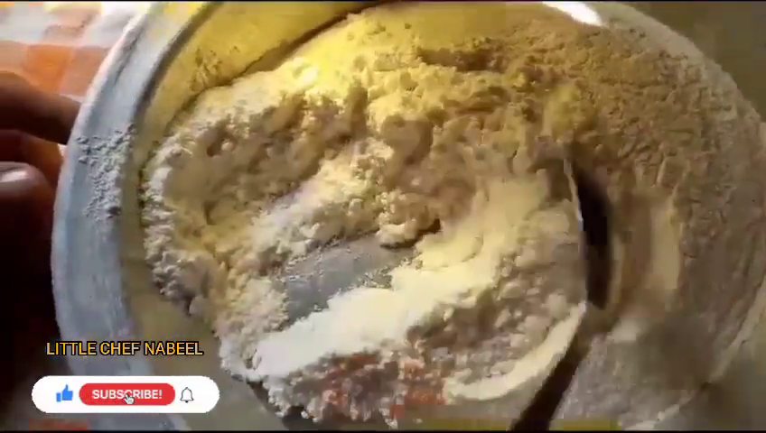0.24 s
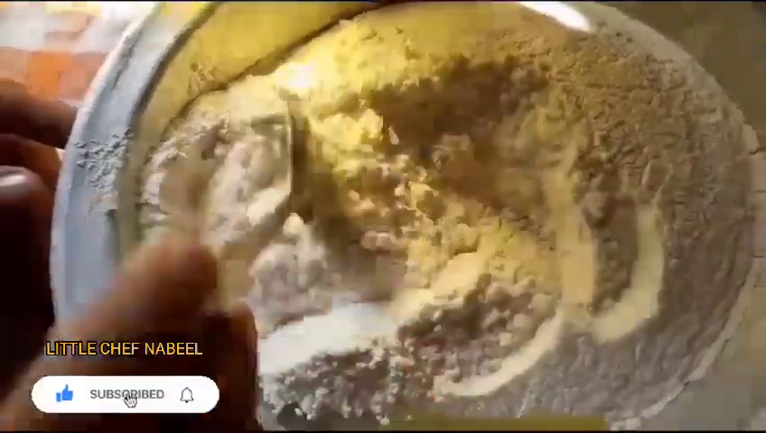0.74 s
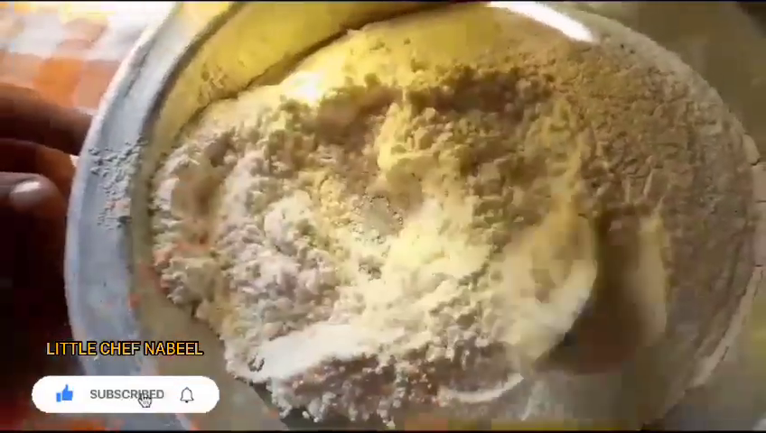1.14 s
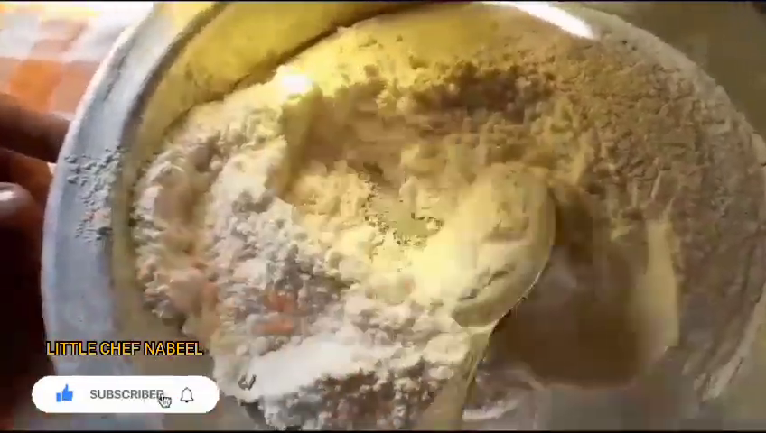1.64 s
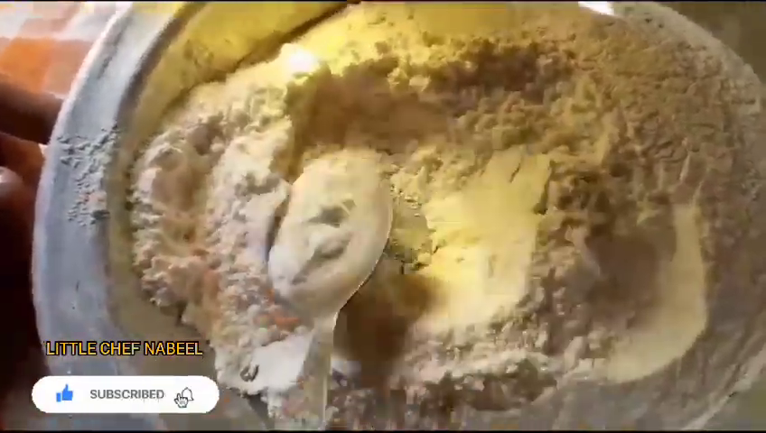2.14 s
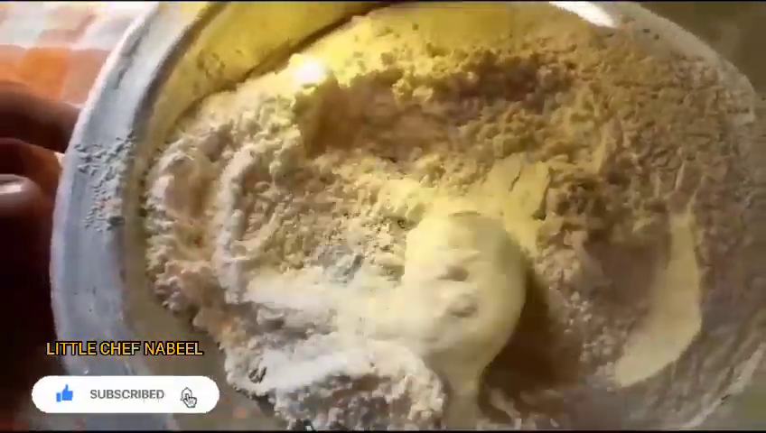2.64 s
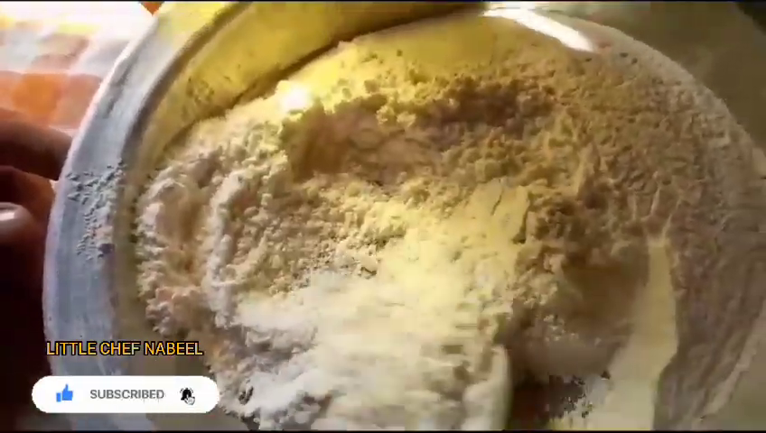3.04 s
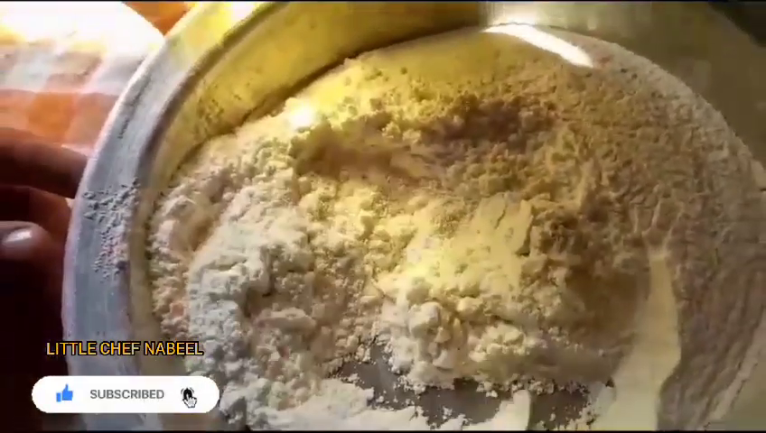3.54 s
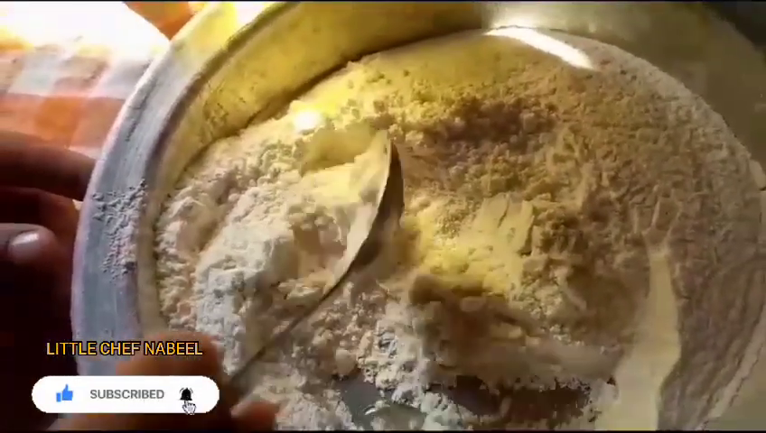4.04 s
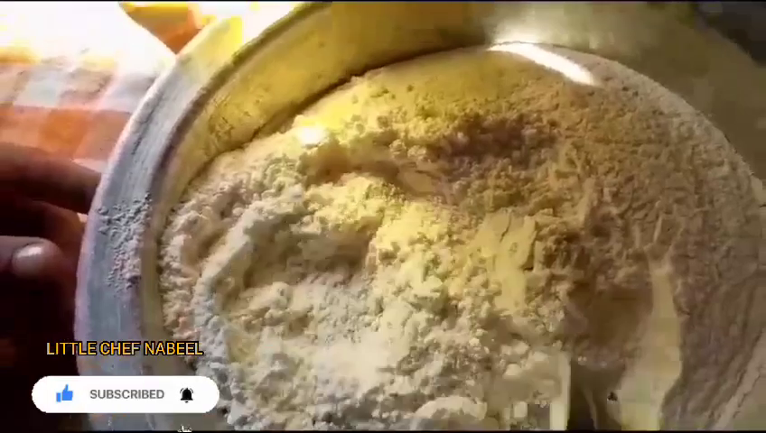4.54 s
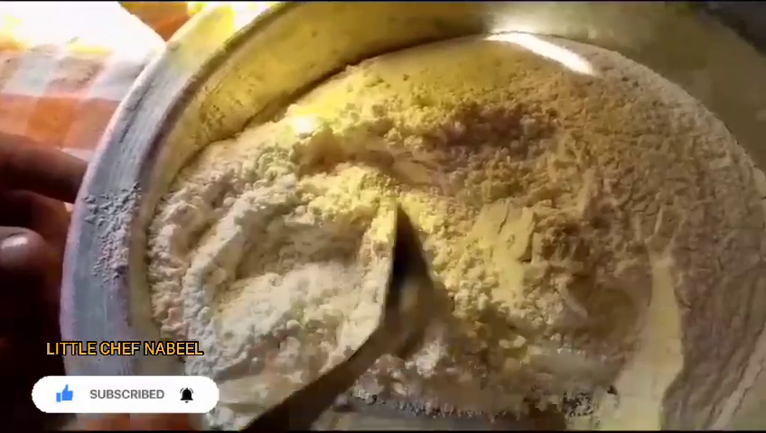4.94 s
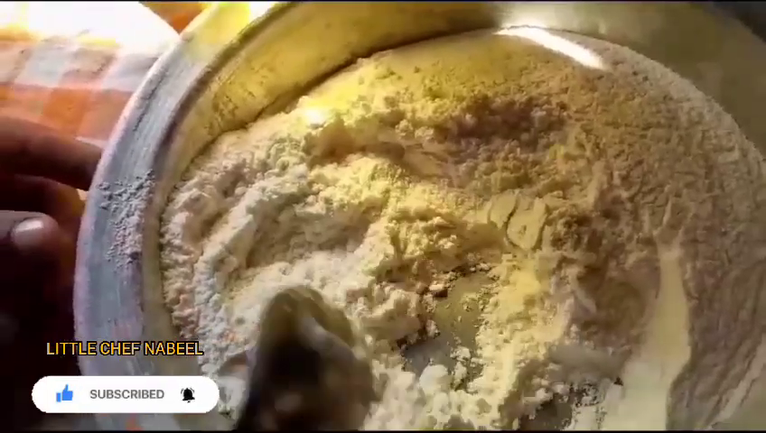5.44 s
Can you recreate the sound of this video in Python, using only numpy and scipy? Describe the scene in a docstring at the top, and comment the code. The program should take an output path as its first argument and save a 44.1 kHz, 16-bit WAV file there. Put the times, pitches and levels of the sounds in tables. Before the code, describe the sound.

Soft flour rustling and light spoon scrapes grow into louder knocks and gritty scraping on a metal bowl, above a low hum.

```python
"""A steel spoon in a steel bowl of flour, close to a handheld two-port microphone in a small kitchen.
A low hum wavers over faint hiss throughout. First the edge scrapes and knocks softly; from 1.3 s light
strokes stir the flour and a faint tone sounds far off. From 2.9 s the edge lands with dull knocks and
judders over the metal in grainy slips, hitting hardest at 3.5 and 4.6 s. A higher far tone blips twice
just before the second of these blows. After 5.3 s the flour settles under one last light scrape."""
import sys
import numpy as np
from scipy import signal
from scipy.io import wavfile
from scipy.ndimage import uniform_filter1d

SR = 44100
rng = np.random.default_rng(int(sys.argv[2]) if len(sys.argv) > 2 else 0)


def wrap_up_sound(samples):
    """Save the sound to the file named by the first command line argument, as 16-bit audio."""
    columns = np.atleast_2d(samples).T
    # keep every value between -1 and 1, then stretch to whole-number steps
    tamed = np.clip(columns, -1, 1)
    steps = np.round(tamed * 32767).astype(np.int16)
    wavfile.write(sys.argv[1], SR, steps)


N = 251370

# Broad hump of noise in the kitchen's hum: freq_hz, density_db
HUM_SPECTRUM = [(12, -88), (20, -44), (32, -41.5), (53, -22.5), (86, -12.5), (134, 2), (168, -7),
                (229, -20), (338, -24), (398, -34.5), (512, -29.5), (577, -40.5), (700, -44.5),
                (910, -99.5), (1540, -120)]
# Swell and fade of the whole hum: time_s, level_db
HUM_LEVEL = [(0.0, -49), (0.38, -56), (0.44, -44.5), (0.65, -52), (1.03, -50.5), (1.11, -61), (1.17, -51),
             (1.57, -60), (1.6, -53), (1.94, -48.5), (2.6, -52), (3.78, -43.5), (4.09, -46), (4.14, -43),
             (5.64, -44.5), (5.7, -55)]
# Low tones in the hum: pitch_hz, drift_share, then level_db (re the hum) at each of DRONE_TIMES
DRONES = [(102.9, .07, -5, -4.5, -7, -9, -7.5, -8.5), (128.75, .04, -8.5, -13, -9.5, -7.5, -3.5, -0.5),
          (153.8, .04, -27, -19, -5.5, -8, -4, -17)]
# Moments at which the drone levels are set: time_s
DRONE_TIMES = (0, 1.5, 1.75, 3.0, 4.3, 5.7)
# Faint background hiss: freq_hz, density_db
HISS_SPECTRUM = [(290, -35), (500, -15.5), (600, -7.5), (1150, -10.5), (1900, -15), (2800, -16),
                 (7300, -26), (9000, -24), (10000, -19), (14200, -16.5), (14900, -25.5), (15700, -26)]
# How alike the background noise is at the two ports: freq_hz, correlation
PORT_LIKENESS = [(30, .5), (70, .975), (150, .96), (300, .7), (700, .4), (3000, .2), (15000, .1)]
# The edge dragged over steel, one curve a scrape: time_s, pressure_db, brightness_db, bottom_hz
SCRAPES = [
    [(0.0, -49.5, -11, 684), (0.034, -63.5, -7.5, 883), (0.12, -82.5, -6, 835)],
    [(0.402, -67.5, 7, 1180), (0.43, -58.5, 2, 1240), (0.476, -52, -2, 1250), (0.5, -66.5, -3, 1220)],
    [(0.765, -62, 1, 761), (0.783, -63.5, -2, 810), (0.831, -46, -2.5, 756), (0.855, -65.5, -3, 820),
     (0.92, -85, 4, 806)],
    [(1.155, -54, -15.5, 836), (1.171, -60, 7, 1216), (1.193, -46.5, 4, 1270), (1.249, -73.5, -3.5, 1270),
     (1.29, -85, 7, 979)],
    [(2.92, -75, 2, 597), (2.99, -39, -10.5, 540), (3.042, -37, -12.5, 1290), (3.086, -35.5, -10, 1310),
     (3.132, -34.5, -11.5, 787), (3.182, -34.5, -3, 890), (3.205, -57, -6, 850)],
    [(3.515, -35.5, -28.5, 788), (3.54, -44, -33.5, 860), (3.585, -54.5, -3.5, 825),
     (3.601, -44, -11.5, 810), (3.68, -57.5, -1, 1140)],
    [(3.67, -53.5, -12, 925), (3.75, -33.5, -13.5, 740), (3.802, -43.5, -10, 750), (3.842, -32, -10, 746),
     (3.854, -40, 6.5, 858), (3.898, -36.5, -14, 880), (3.935, -57, -3, 910), (3.97, -81, -3, 910)],
    [(4.586, -34.5, -34, 900), (4.622, -47, -18.5, 847), (4.655, -52, -10, 814)],
    [(4.645, -50, -12, 1090), (4.699, -37.5, -5, 1326), (4.75, -37, -12.5, 1235), (4.789, -37, -4, 1188),
     (4.82, -61.5, -4.5, 1170)],
    [(5.17, -62.5, -8.5, 910), (5.224, -34.5, -7, 853), (5.254, -28.5, -12.5, 818),
     (5.31, -37.5, -3.5, 854), (5.345, -54.5, -1.5, 878)],
    [(5.66, -68.5, 6, 1134), (5.7, -50.5, -2, 1065)],
]
# Where each scrape rubs: wall_db (re pressure), wall_hz, bare_steel_db (how freely the modes ring)
SCRAPE_SPOTS = [(3.5, 2700, -13), (-4.5, 2730, -2.5), (-6.5, 3750, -3.5), (-4.5, 4000, -7), (3, 3400, -3.5),
                (-1.5, 3500, 0.5), (2.5, 4500, 1), (-3, 2200, -2.5), (1.5, 4500, -1), (-7, 3510, 0.5),
                (-6.5, 2800, -1)]
# Modes of the bowl, before the flour's added damping: pitch_hz, width_hz, level_db
BOWL_MODES = [(883, 300, 6.5), (1498, 77, 1.5), (2424, 22, -29), (3174, 840, -5.5), (3996, 160, -11.5),
              (4430, 180, -10.5), (5296, 300, -7), (5830, 43, -7.5), (6440, 180, -19), (6770, 330, -12),
              (7330, 36, -5), (7584, 78, 0), (8338, 260, -12.5), (8600, 44, -18), (9100, 41, -25),
              (9750, 26, -29.5), (10100, 62, -27.5), (13700, 270, -18), (13550, 530, -24),
              (14100, 51, -30.5)]
# Dull sound of contact between the modes: freq_hz, level_db
CONTACT_SPECTRUM = [(240, -30), (400, -19.5), (615, 0.5), (822, 1.5), (1130, 1.5), (2330, -7),
                    (2720, -13.5), (3270, -25), (4800, -20), (6930, -27), (7720, -15.5), (15600, -27)]
# The spoon meets or catches on the bowl:
# start_s, level_db, thump_db, brightness_db (both re level), bottom_hz, wall_hz
KNOCKS = [(0.403, -55, 18, -7, 1570, 2760), (0.758, -45, 8, -6, 530, 3030),
          (0.804, -40, -26.5, -26, 850, 3580), (1.149, -34.5, 1.5, -12, 550, 2960),
          (1.179, -34, -2, -19.5, 1500, 4520), (1.568, -49.5, -20, -23, 1600, 2860),
          (2.921, -60, 1, -8.5, 450, 3010), (2.963, -26, -27.5, -16, 518, 2800),
          (2.987, -29.5, -21.5, -20, 540, 3530), (3.029, -24.5, -24.5, -20, 1387, 4050),
          (3.065, -23, -30, -8.5, 793, 3200), (3.089, -28.5, -33, 8.5, 1444, 3600),
          (3.103, -22.5, -30.5, -3.5, 1670, 3530), (3.161, -29, -35.5, 9.5, 775, 3380),
          (3.167, -22.5, -31.5, -15, 680, 3380), (3.179, -21.5, -39.5, -2, 963, 3380),
          (3.5043, -12, -10.5, -20.5, 652, 3200), (3.603, -23.5, -25, -16, 705, 3930),
          (3.63, -29.5, -26.5, -18.5, 1510, 3750), (3.721, -29, -25, -21.5, 1443, 3330),
          (3.746, -22, -29.5, -14, 760, 3900), (3.837, -20.5, -41, -20, 840, 3600),
          (3.855, -33.5, -27.5, 18.5, 1160, 3510), (3.902, -28, -36, -9, 950, 3720),
          (4.575, -10, -6.5, -16, 650, 3230), (4.662, -31.5, -22, -16, 1380, 3280),
          (4.787, -21, -29.5, -1.5, 1749, 4040), (4.8, -31, -35, 0.5, 1258, 2860),
          (5.221, -34.5, -22, -19, 860, 3570), (5.273, -22, -29.5, -20, 729, 3310),
          (5.312, -25.5, -35.5, -19.5, 770, 3000)]
# Flour pushed aside or settling: loudest_s, rustle_db, crumbs_db, crumbs_hz, rise_s, fall_s
STIRS = [(0.504, -71.5, -68.5, 2220, 0.00965, 0.12), (0.659, -92, -77.5, 2430, 0.33, 0.39),
         (.905, -77, -73.5, 2000, 0.0105, 0.07), (1.285, -79, -78, 2500, 0.0087, .1),
         (1.563, -63, -73.5, 1600, 0.084, 0.084), (1.904, -66.5, -74, 1440, .065, .09),
         (2.308, -62.5, -77.5, 2100, 0.0878, 0.06), (2.441, -85, -86, 1200, 0.22, .1),
         (2.63, -62, -76, 1100, .085, 0.06), (3.209, -63, -74, 3200, 0.0114, .1),
         (3.33, -82.5, -80, 2200, 0.16, 0.293), (3.959, -71.5, -68.5, 3213, .01, 0.18),
         (4.25, -74.5, -73.5, 2605, 0.33, 0.17), (4.336, -65, -79.5, 2491, 0.1105, 0.13),
         (4.83, -68, -69.5, 2780, 0.011, 0.1), (4.93, -78, -73.5, 2650, 0.218, 0.6),
         (5.345, -69, -63, 2286, .01, 0.219), (5.439, -82, -76, 2300, .15, 0.218),
         (5.534, -67.5, -61, 2217, .008, 0.18)]
# Rustle of fine flour: freq_hz, density_db
RUSTLE_SPECTRUM = [(2350, -37), (4000, -18.5), (4430, -14.5), (5410, -7.5), (6130, -5), (7620, -6),
                   (9040, -5.5), (10000, -4), (12100, -6.5), (13900, -4), (15600, -19)]
# Tumbling crumbs: freq_hz, density_db
CRUMB_SPECTRUM = [(710, -21.5), (1200, -10.5), (1820, 0.5), (1970, -7), (2260, -1), (3140, 2.5), (3840, -8),
                  (5000, -2.5), (6500, -43), (11000, -120)]
# Faint far tones: start_s, pitch_hz, level_db, fade_s (to 20 dB down)
FAR_TONES = [(1.43, 831, -66, .14), (4.335, 1306, -78.5, .04), (4.43, 1306, -80, .035)]
# Reverberation of the kitchen: freq_hz, t60_s
KITCHEN_DECAY = [(300, 0.38), (1000, .24), (3000, 0.32), (7000, 0.087), (14000, 0.21)]
# Colour of the right port re the left: freq_hz, gain_db
RIGHT_COLOUR = [(100, -20.5), (400, -3), (1500, -2.5), (2500, -1), (3800, -4.5), (5000, -6), (6500, -19),
                (7600, -32.5), (8800, -21), (10400, -1), (12000, -12), (14300, -17.5), (15200, -47.5)]
# Lag of the right port behind the left: freq_hz, lag_rad
RIGHT_LAG = [(0, 0), (500, .6), (1100, 1.5), (2300, 1.1), (3300, 5.5), (4500, 8.5), (16000, 37)]
# Wavering of that lag as the spoon moves: freq_hz, waver_rad
RIGHT_WAVER = [(200, .35), (700, .3), (1500, .55), (4000, .95), (9000, 1.7), (15000, 2.1)]

HUMP_DB, HISS_DB = -2.5, -79.5  # the hump is re the level of the hum
DRONE_WAVER_DB, DRONE_PACE = 2.5, 4.16
WALL_DRIFT_SHARE, WALL_SLOPE = 0.057, 0.66  # slopes: dB for each dB of a scrape's brightness
RASP_DB, RASP_SLOPE = 2, 0.26
KNOCK_DECAY_S, KNOCK_FIZZ_DB, CUSHION_HZ, THUMP_HZ = 0.0026, -8, 1500, 261
STIR_SWELL_DB, TONE_RISE_S = 23, 0.035
LOW_SPLIT_HZ, HIGH_SPLIT_HZ, BAND_LIMIT_HZ = 2600, 6500, 15790


def amp(db):
    """Decibels to gain."""
    return 10 ** (np.asarray(db) / 20)


def unit_rms(x):
    """Scales to rms 1."""
    return x / np.sqrt(np.mean(x ** 2) + 1e-20)


def at_freq(table, hz):
    """Reads a table on a log-frequency axis."""
    freq_hz, value = np.transpose(table)
    return np.interp(np.log(hz + 1), np.log(freq_hz + 1), value)


def add(mix, start_s, sound):
    """Mixes a sound in at start_s."""
    part = mix[round(start_s * SR):][:len(sound)]
    part += sound[:len(part)]


def wander(count, pace):
    """Slow random drift of rms 1; a higher pace turns sooner."""
    steps = rng.standard_normal(int(count / SR * 40) + 3)
    steps = signal.lfilter([1], [1, -np.exp(-pace / 10)], steps)
    return unit_rms(np.interp(np.arange(count) / SR * 40, np.arange(len(steps)), steps - steps.mean()))


def patches(noise, bins, frames):
    """Smooths a frequency-by-time grid of noise into patches of rms 1."""
    return unit_rms(uniform_filter1d(uniform_filter1d(noise, bins, axis=0), frames, axis=1))


def impulse(spectrum):
    """Minimum-phase response with the given spectrum."""
    hz = abs(np.fft.fftfreq(4096, 1 / SR))
    log_gain = np.log(amp(np.maximum(at_freq(spectrum, hz), -100)))
    return np.fft.ifft(np.exp(np.conj(signal.hilbert(log_gain)))).real[:2048]


def resonate(x, hz, *widths_hz):
    """A resonance that can move in pitch, applied once for each width."""
    turn = np.exp(2j * np.pi * np.cumsum(hz * np.ones(len(x))) / SR)
    for width_hz in widths_hz:
        pole = np.exp(-np.pi * width_hz / SR)
        x = 2 * (turn * signal.lfilter([1 - pole], [1, -pole], x / turn)).real
    return x


def band(x, kind, hz, order=4):
    """Low-pass or high-pass filter."""
    return signal.sosfilt(signal.butter(order, hz, kind, fs=SR, output="sos"), x)


def split(x):
    """Low, middle and high part of a sound."""
    upper = band(x, "high", LOW_SPLIT_HZ)
    mid, high = band(upper, "low", HIGH_SPLIT_HZ), band(upper, "high", HIGH_SPLIT_HZ)
    return band(x, "low", LOW_SPLIT_HZ), mid, high


def room_noise(spectrum, patchy_db, size):
    """Background noise with drifting patches, partly alike at the two ports."""
    frames, hz = 4 * N // size + 5, np.fft.rfftfreq(size, 1 / SR)
    left_re, left_im, apart_re, apart_im, unevenness = rng.standard_normal((frames, len(hz), 5)).T
    likeness = at_freq(PORT_LIKENESS, hz)[:, None]
    left = left_re + 1j * left_im
    right = likeness * left + np.sqrt(1 - likeness ** 2) * (apart_re + 1j * apart_im)
    gain = amp(at_freq(spectrum, hz)[:, None] + patchy_db * patches(unevenness, bins=10, frames=6))
    noise = signal.istft(gain * np.array([left, right]), nperseg=size, noverlap=3 * size // 4)[1]
    return unit_rms(noise[:, :N])


def drone(pitch_hz, drift_share, *levels_db):
    """Noise through a narrow, drifting resonance: a fuzzy low tone that comes and goes."""
    hz = pitch_hz * (1 + drift_share * wander(N, DRONE_PACE))
    waver = unit_rms(amp(DRONE_WAVER_DB * wander(N, DRONE_PACE)))
    level_db = np.interp(np.arange(N) / SR, DRONE_TIMES, levels_db)
    return amp(level_db) * waver * unit_rms(resonate(rng.standard_normal(N), hz, 5, 3.4))


def hum():
    """The kitchen's hum: a hump of low noise with drones on top, all swelling and fading together."""
    hump = amp(HUMP_DB) * room_noise(HUM_SPECTRUM, patchy_db=2.5, size=4096)
    level_db = np.interp(np.arange(N) / SR, *np.transpose(HUM_LEVEL))
    return amp(level_db) * (hump + sum(drone(*row) for row in DRONES))


def hiss():
    """Faint, steady broadband noise behind everything."""
    return amp(HISS_DB) * room_noise(HISS_SPECTRUM, patchy_db=0.1, size=1024)


def grit(count, per_s, spread_db, smooth):
    """Grains: random clicks of uneven size over a share of smooth noise."""
    chance, size, noise = rng.random(count), rng.exponential(1, count), rng.standard_normal(count)
    clicks = np.sign(noise) * amp(spread_db * np.minimum(size, 4)) * (chance < per_s / SR)
    return unit_rms(clicks) + smooth * noise


def bowl_ring(touch_db, bare_steel_db):
    """The bowl after one click: modes, weighted by where it is touched, over the dull contact sound."""
    t = np.arange(2048) / SR
    modes = sum(amp(db + weight_db) * width * np.exp(-np.pi * width * t) * np.sin(2 * np.pi * hz * t)
                for (hz, width, db), weight_db in zip(BOWL_MODES, touch_db))
    flour_damping = np.exp(-t / 0.0035)
    contact = unit_rms(impulse(CONTACT_SPECTRUM))
    return amp(bare_steel_db) * unit_rms(flour_damping * modes) + 1.28 * contact


def scrape(curve, wall_db, wall_hz, ring):
    """The edge sticks and slips: bursts of grit shake the bowl; bottom and wall shift in pitch."""
    times_s, *columns = np.transpose(curve)
    t = np.arange(times_s[0], times_s[-1], 1 / SR)
    pressure_db, brightness_db, bottom_hz = (np.interp(t, times_s, column) for column in columns)
    count = len(t)
    drifting_hz = wall_hz * (1 + WALL_DRIFT_SHARE * wander(count, pace=8.9))
    slips = abs(grit(count, per_s=140, spread_db=1, smooth=0))
    judder = unit_rms(signal.lfilter([1], [1, -np.exp(-1 / (0.004 * SR))], slips))  # slips die in ms
    lumps = (4 + judder) * grit(count, per_s=1200, spread_db=0.5, smooth=0.75)
    dust = (2.1 + judder) * grit(count, per_s=3500, spread_db=2, smooth=1.7)
    rasp = unit_rms(split(signal.fftconvolve(lumps, ring)[:count])[0])
    _, mid, fizz = split(signal.fftconvolve(dust, ring)[:count])
    bottom_note = unit_rms(resonate(lumps, bottom_hz, 370, 260))
    wall_note = unit_rms(resonate(dust, drifting_hz, 730, 730))
    bottom = unit_rms(amp(RASP_DB + RASP_SLOPE * brightness_db) * rasp + 0.49 * bottom_note)
    wall = unit_rms(unit_rms(mid) + 0.35 * wall_note)
    sound = bottom + amp(wall_db + WALL_SLOPE * brightness_db) * wall
    sound += amp(brightness_db) * unit_rms(fizz)
    return times_s[0], amp(pressure_db) * sound * signal.windows.tukey(count, min(1, 400 / count))


def knock(row, ring, crack):
    """A short crack sets the modes off, bottom and wall ring at their own pitch, the bowl thumps."""
    start_s, level_db, thump_db, brightness_db, bottom_hz, wall_hz = row
    t = np.arange(len(ring)) / SR
    envelope = (1 - np.exp(-t / 0.0003)) * np.exp(-t / KNOCK_DECAY_S)
    low, mid, fizz = split(signal.fftconvolve(crack * envelope[:len(crack)], ring)[:len(ring)])
    low = signal.lfilter([1], [1, -np.exp(-2 * np.pi * CUSHION_HZ / SR)], low)  # flour dulls the blow
    low, mid, fizz = (part / abs(part).max() for part in (low, mid, fizz))
    thud = np.sin(2 * np.pi * bottom_hz * t) * np.sqrt(envelope)
    tick = np.sin(2 * np.pi * wall_hz * t) * envelope
    thump = np.sin(2 * np.pi * THUMP_HZ * t) * np.exp(-t / 0.00265)
    bottom = 0.55 * low + 0.5 * thud + amp(thump_db) * thump
    wall = 0.71 * mid + 0.67 * tick + amp(KNOCK_FIZZ_DB) * fizz
    return start_s, amp(level_db) * (bottom + amp(brightness_db) * wall)


def stir(loudest_s, rustle_db, crumbs_db, crumbs_hz, rise_s, fall_s):
    """Fine flour hisses past the spoon while crumbs tumble lower down; both swell and die together."""
    t = np.arange(-rise_s, fall_s, 1 / SR)
    count = len(t)
    swell = amp(-STIR_SWELL_DB * np.maximum(-t / rise_s, t / fall_s)) * signal.windows.tukey(count, 0.04)
    grains = grit(count, per_s=10000, spread_db=-7, smooth=1.6)
    rustle = unit_rms(signal.fftconvolve(grains, impulse(RUSTLE_SPECTRUM))[:count])
    crumbs = unit_rms(signal.fftconvolve(grains, impulse(CRUMB_SPECTRUM))[:count])
    crumbs = unit_rms(crumbs + 0.7 * unit_rms(resonate(grains, crumbs_hz, 400)))
    return loudest_s - rise_s, (amp(rustle_db) * rustle + amp(crumbs_db) * crumbs) * swell


def far_tone(start_s, pitch_hz, level_db, fade_s):
    """A thin sine from far away, unsteady in level."""
    t = np.arange(0, TONE_RISE_S + 2 * fade_s, 1 / SR)
    rise = np.minimum(t / TONE_RISE_S, 1)
    fade = amp(-20 * (np.maximum(t - TONE_RISE_S, 0) / fade_s) ** 2)
    waver = 1 + 0.39 * unit_rms(uniform_filter1d(rng.standard_normal(len(t)), size=900))
    return start_s, np.sqrt(2) * amp(level_db) * rise * fade * waver * np.sin(2 * np.pi * pitch_hz * t)


def kitchen_reverb(x):
    """Sparse reflections of random sign, a set for each port, each band dying at its own speed."""
    taps = np.zeros((2, SR // 2))
    slots = np.arange(200, SR // 2 - 20, 20)
    arrivals = slots + rng.integers(0, 20, (2, len(slots)))
    np.put_along_axis(taps, arrivals, rng.choice([-1., 1.], arrivals.shape), 1)
    hz, t, spectra = signal.stft(taps, SR, nperseg=256)
    decay = amp(-60 * t / at_freq(KITCHEN_DECAY, hz)[:, None])
    tail = signal.istft(spectra * decay, SR, nperseg=256)[1]
    return signal.fftconvolve(x[None], tail / np.linalg.norm(tail[0]), axes=1)[:, :N]


def microphone_ports(left, right):
    """Sound reaches the right port later and coloured, by shifting paths round the recorder's body."""
    hz, t, spectra = signal.stft(right, SR, nperseg=256, noverlap=192)
    drift = patches(rng.standard_normal((len(t), len(hz))).T, bins=4, frames=10)
    frame_samples = np.minimum(t * SR, N - 1).astype(int)
    sway = 1 + 0.13 * wander(N, pace=4.2)[frame_samples]
    lag_rad = np.interp(hz, *np.transpose(RIGHT_LAG))[:, None] * sway
    lag_rad += at_freq(RIGHT_WAVER, hz)[:, None] * drift
    spectra = spectra * amp(at_freq(RIGHT_COLOUR, hz))[:, None] * np.exp(-1j * lag_rad)
    return np.array([left, signal.istft(spectra, SR, nperseg=256, noverlap=192)[1][:N]])


def scene():
    """Spoon and flour close to the microphone with a little room; far tones, hum and hiss behind."""
    spoon, far = np.zeros(N), np.zeros(N)
    touches_db = 4 * rng.standard_normal((len(SCRAPES), len(BOWL_MODES)))
    for curve, (wall_db, wall_hz, bare_steel_db), touch_db in zip(SCRAPES, SCRAPE_SPOTS, touches_db):
        add(spoon, *scrape(curve, wall_db, wall_hz, bowl_ring(touch_db, bare_steel_db)))
    for row in KNOCKS:
        crack = rng.standard_normal(768)
        ring = bowl_ring(touch_db=3 * rng.standard_normal(len(BOWL_MODES)), bare_steel_db=0)
        add(spoon, *knock(row, ring, crack))
    for row in STIRS:
        add(spoon, *stir(*row))
    for row in FAR_TONES:
        add(far, *far_tone(*row))
    spoon = band(spoon, "high", hz=170, order=3)  # sounds thin, its bass rolled off at the microphone
    left, right = spoon + amp(-17) * kitchen_reverb(spoon)
    close = amp(2) * microphone_ports(left, right)
    return close + far + hum() + hiss()


def record(dry):
    """The handheld recorder cuts off steeply at its band limit."""
    lowpass = signal.firwin(1023, BAND_LIMIT_HZ, window=("kaiser", 9), fs=SR)
    return signal.oaconvolve(dry, lowpass[None], "same")


dry = scene()
out = record(dry)
wrap_up_sound(out)
```